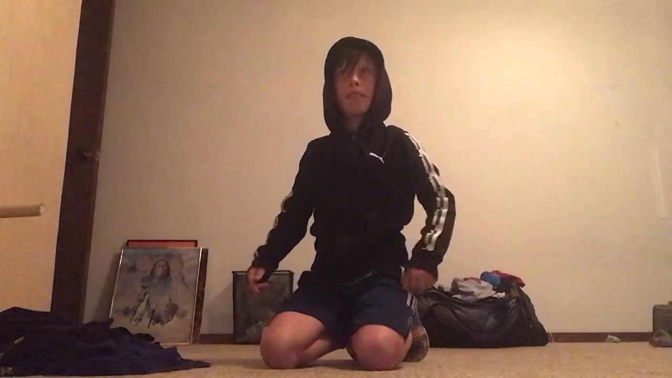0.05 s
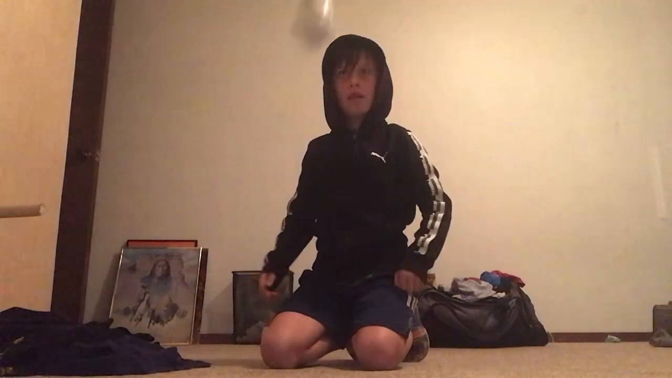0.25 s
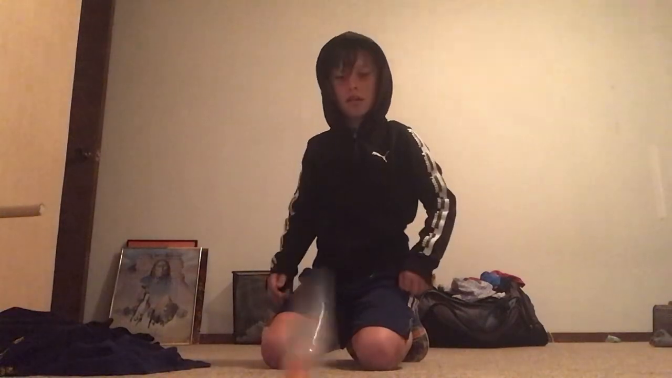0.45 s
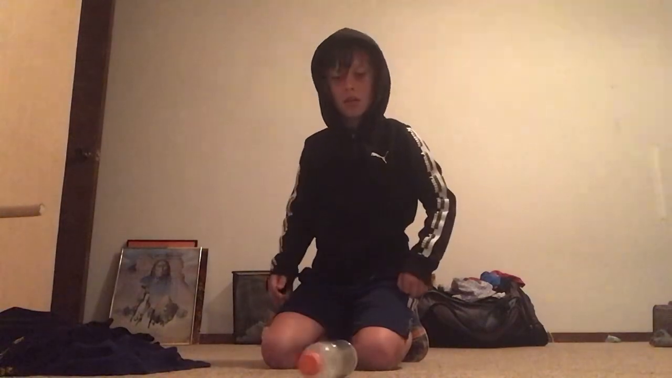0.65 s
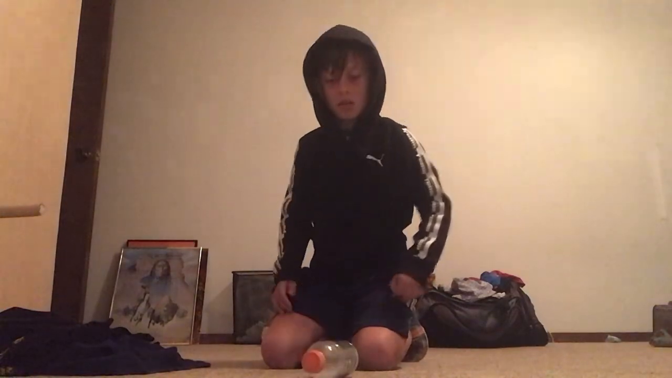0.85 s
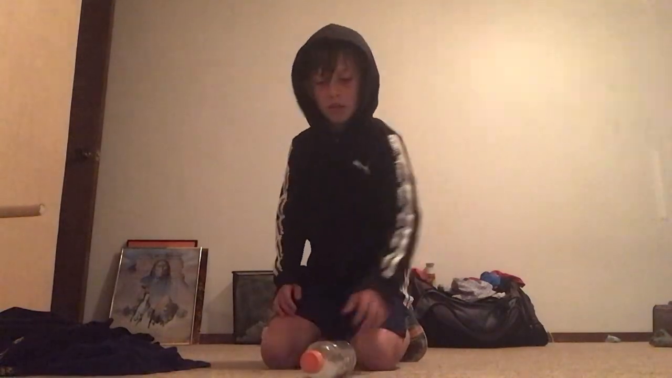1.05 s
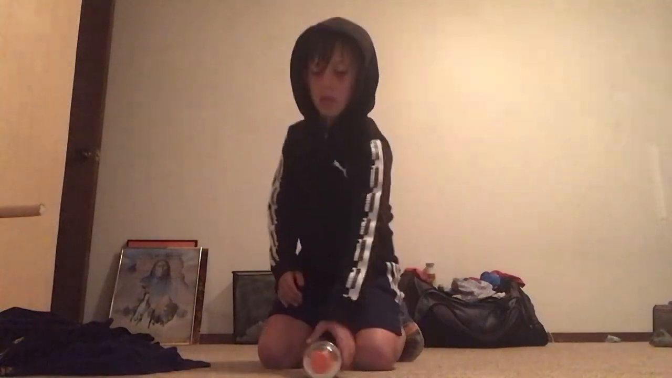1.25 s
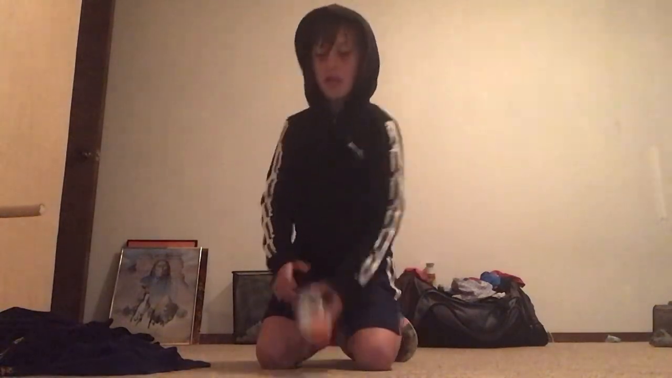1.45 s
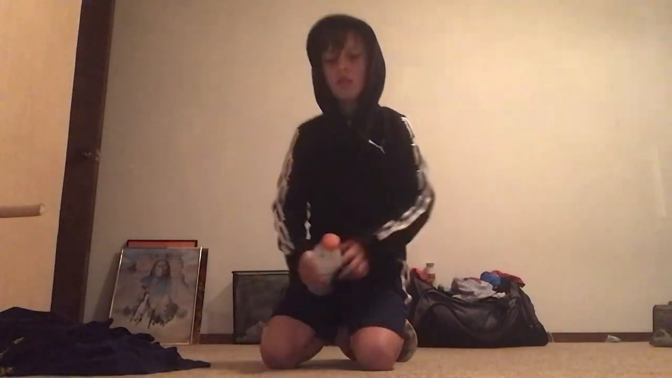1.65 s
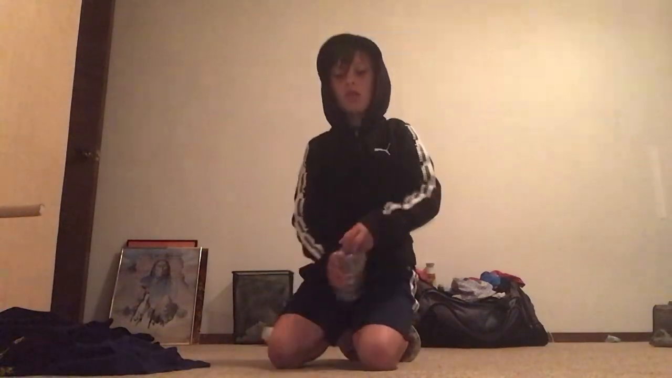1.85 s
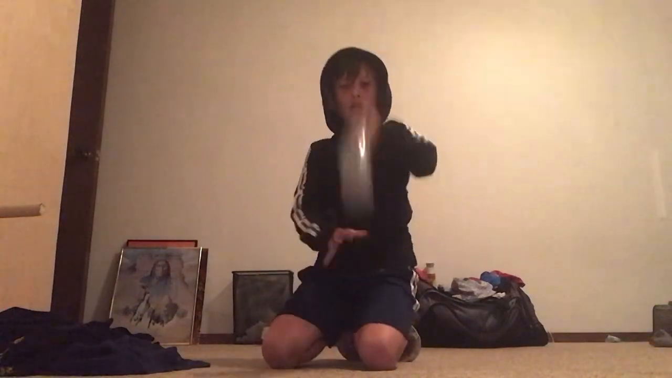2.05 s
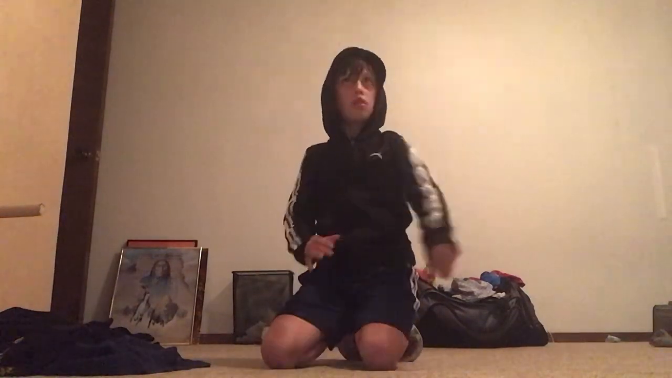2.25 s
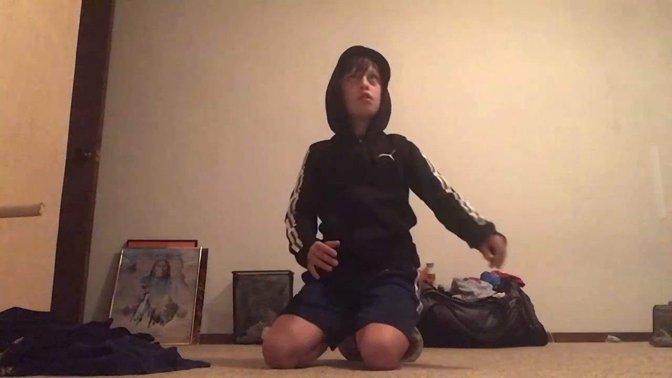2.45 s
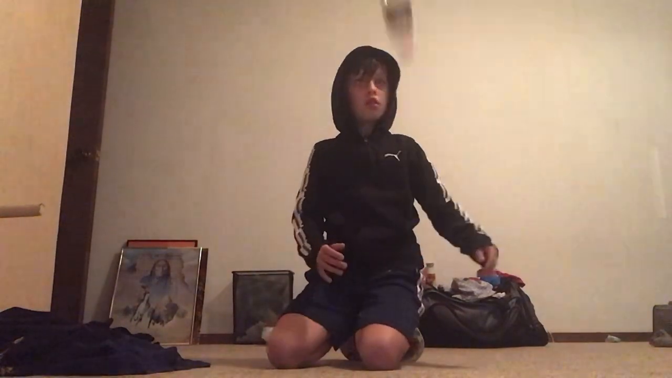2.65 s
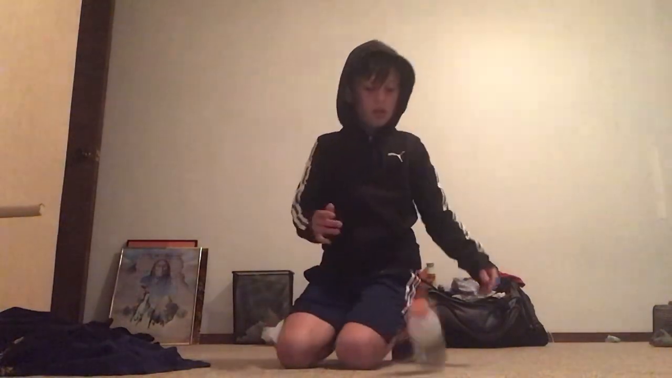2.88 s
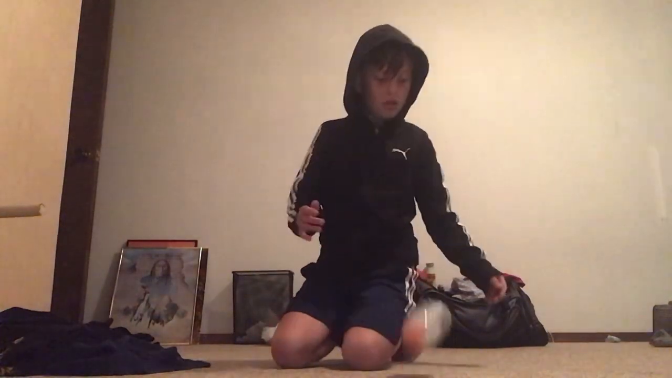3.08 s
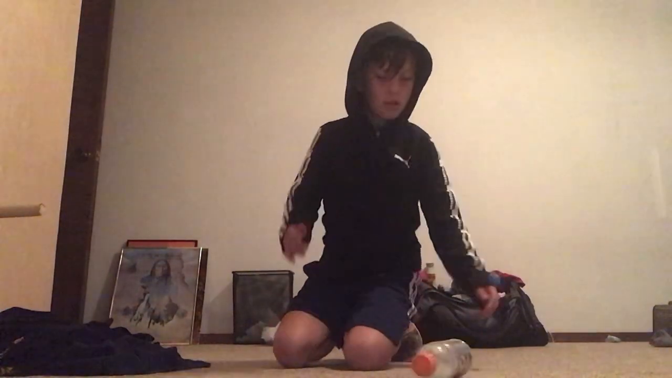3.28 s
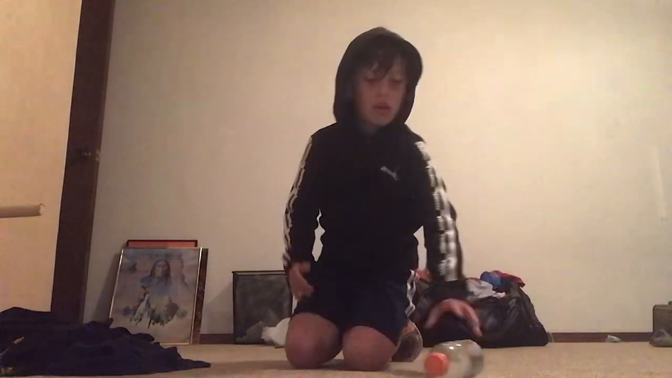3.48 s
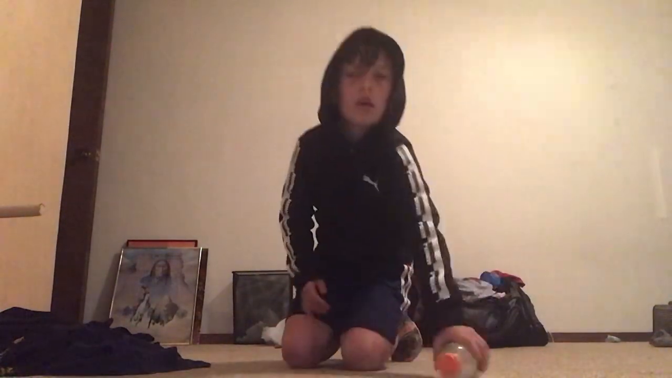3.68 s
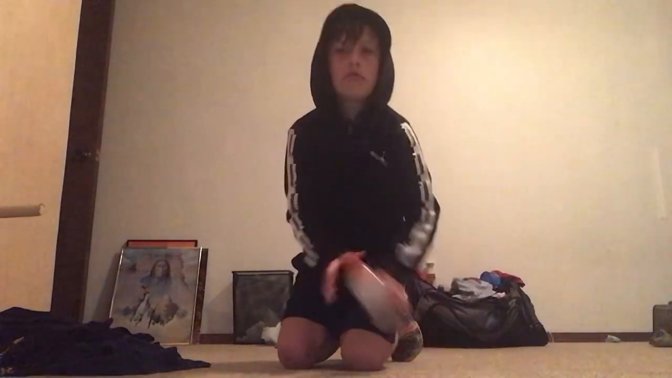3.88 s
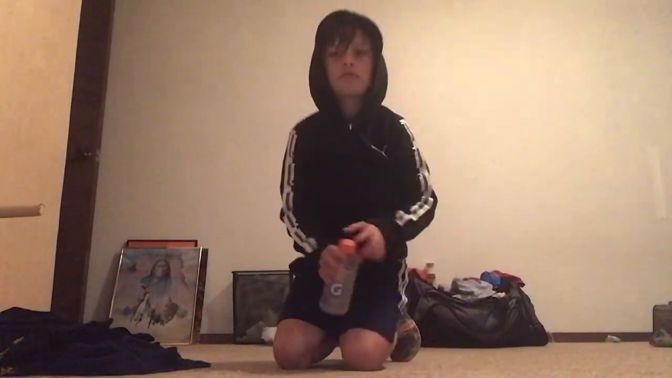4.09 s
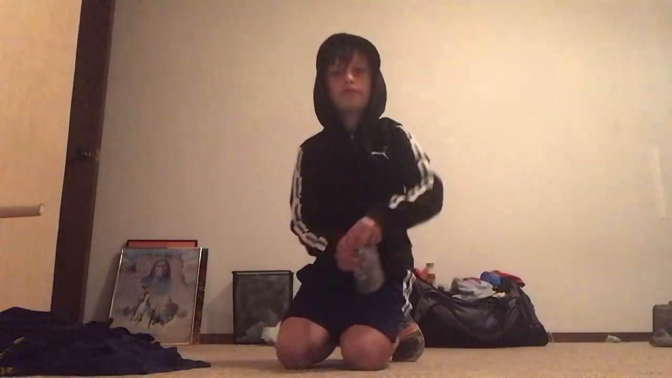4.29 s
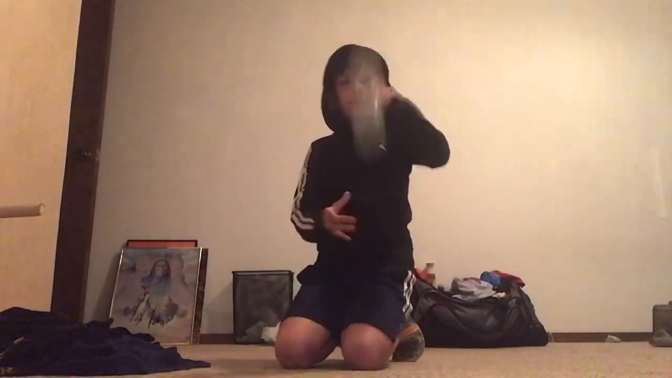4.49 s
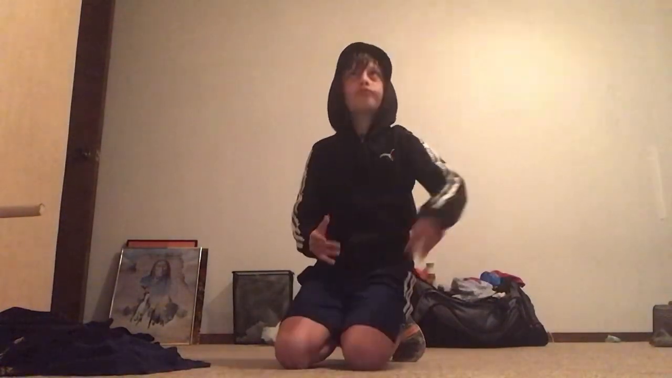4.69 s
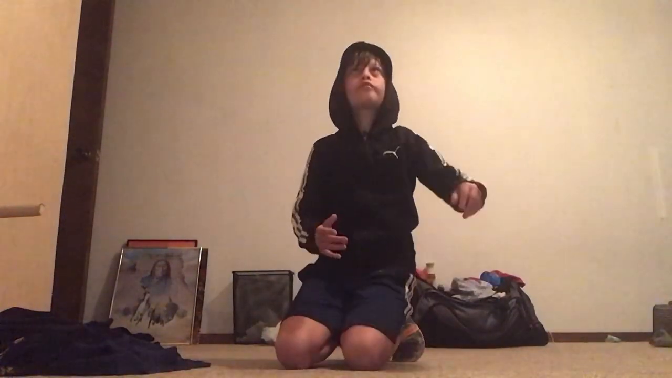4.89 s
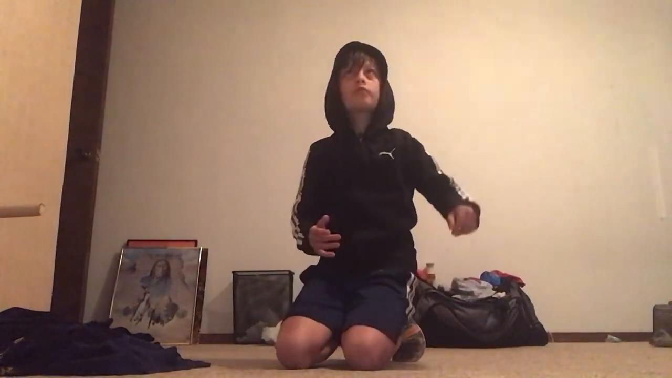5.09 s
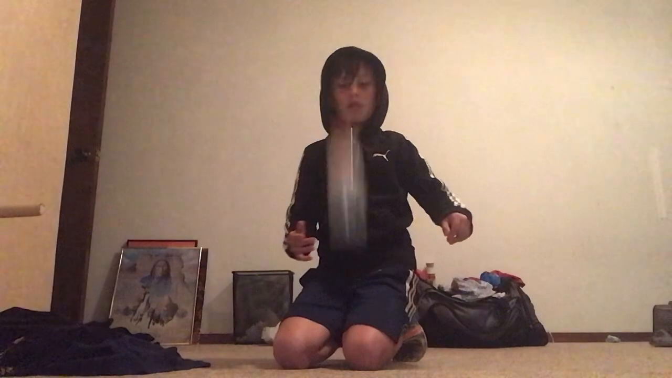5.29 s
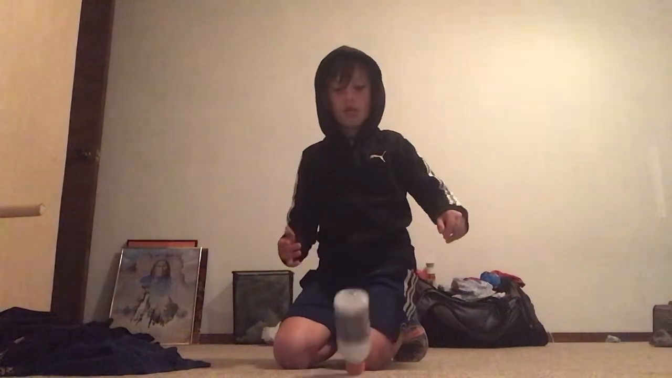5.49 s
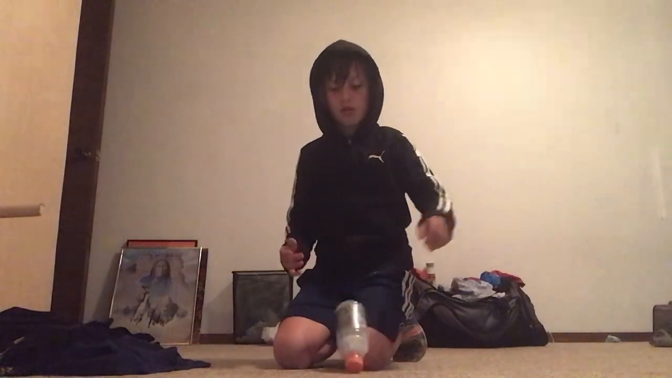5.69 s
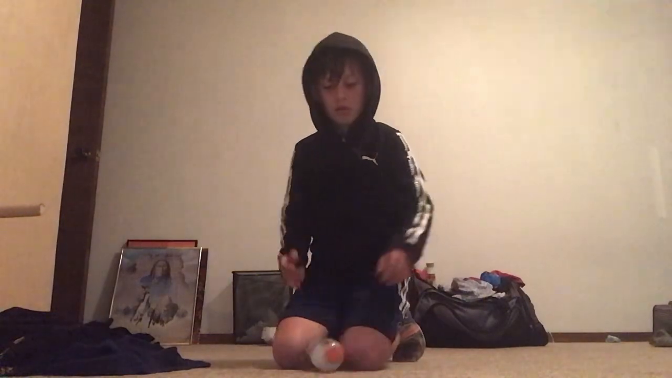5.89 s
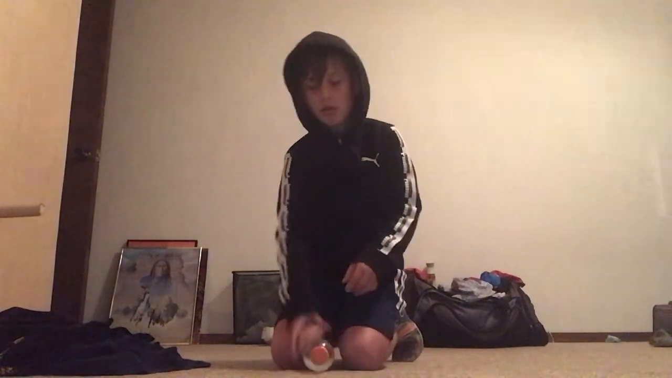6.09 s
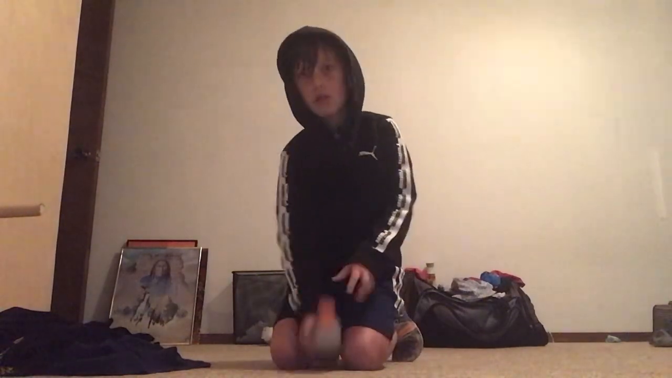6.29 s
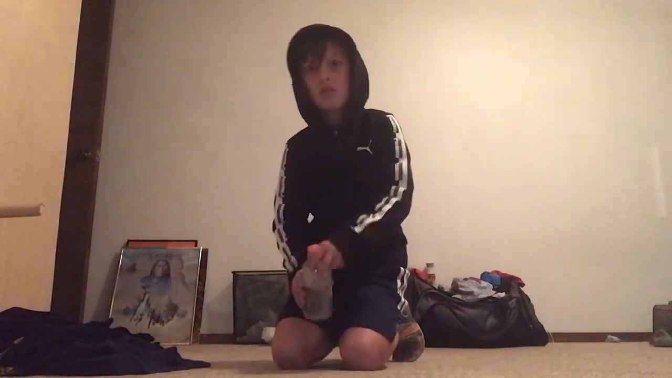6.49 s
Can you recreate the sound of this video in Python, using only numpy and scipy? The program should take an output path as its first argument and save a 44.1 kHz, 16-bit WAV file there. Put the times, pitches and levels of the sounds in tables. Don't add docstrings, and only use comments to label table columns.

```python
import sys
import numpy as np
from scipy import signal
from scipy.fft import rfft, irfft
from scipy.io import wavfile
from scipy.ndimage import uniform_filter1d

SR = 44100
rng = np.random.default_rng(int(sys.argv[2]) if len(sys.argv) > 2 else 0)


def store_wav(level_fs):
    pcm = np.round(np.clip(np.atleast_2d(level_fs), -1, 1) * 32767)
    wavfile.write(sys.argv[1], SR, pcm.T.astype(np.int16))


def makeup_ratio(level_db):
    decades = np.asarray(level_db, float) / 20
    return 10 ** decades


N = 288414

# (frequency [Hz], level per Hz [dB])
HUSH_COLOUR = [(26, -32.5), (45, 4), (92, 0), (291, -9), (525, -21), (760, -26), (948, -32), (2530, -34),
               (2860, -35), (3940, -34.5), (9320, -39.5), (13100, -44.5), (16000, -60)]
HUSH_DB = -64
# (frequency [Hz], width [Hz], level [dB])
HOUSE_TONES = [(610, 19, -82), (1815, 60, -91)]
TONE_TOPS_S = [.06, 1.45, 2.85, 3.43, 5.8]
TONE_SWELL_S, TONE_REST_DB = 1.6, -9
# (frequency [Hz], level [dB], time to fade by 60 dB [s])
ROOM_MODES = [(70, -19, 0.49), (97, -13.5, 0.42), (111.6, -11.5, 0.42), (146.5, 4, 0.29),
              (170.2, 1.5, 0.15), (222.2, -5.5, 0.35), (251.6, 0.5, 0.22), (305.7, -9.5, 0.37),
              (335.8, -10, 0.21), (368.2, -3.5, 0.22), (420.3, -10, 0.27), (488.4, -17.5, 0.32)]
# (frequency [Hz], time to fade by 60 dB [s])
ROOM_FADE = [(200, 0.37), (600, 0.43), (1500, 0.11), (4000, 0.29), (8000, 0.14), (14000, 0.16)]
# (frequency [Hz], level [dB], time to fade by 60 dB [s])
WALL_MODES = [(615, -10.5, 0.073), (729.3, -4, 0.089), (830.4, -3.5, 0.093), (932, -6.5, 0.053),
              (1052, -8.5, 0.069), (1170, -14, 0.043)]
# (frequency [Hz], level [dB])
MICROPHONE = [(20, -43.5), (40, -10), (70, 1), (8500, 0.5), (11000, -4.5), (13500, -8), (15800, -6),
              (16150, -11.5), (16400, -69)]

# (time of the top [s], fizz level [dB], rise per 60 dB [s], fall per 60 dB [s], centre [Hz])
RUSTLES = [(0.07, -69, 3, .35, 3950), (4.562, -68, .25, .1, 3500), (.72, -75, 0, 0.7, 4700),
           (1.22, -76, -0.3, 3, 4950), (1.392, -68.5, .5, 0.7, 5000), (2.156, -68, 0.43, 0.44, 4850),
           (2.201, -61, .31, .31, 5000), (2.86, -69.5, 0.36, 1.1, 4800), (3.87, -77, 2, 2, 4900),
           (4.17, -63, 1.5, 1.08, 4700), (5.32, -74.5, 2, 1.5, 3500), (5.919, -67, .14, .6, 4950),
           (5.99, -70, .7, .22, 4450), (6.261, -56, 0.25, .3, 5500), (6.52, -72, 1, -3, 5900)]
RUSTLE_SLOSH_DB, RUSTLE_SCUFF_DB = -7, 1.5
# (time [s], fizz level [dB], time to fade by 60 dB [s],
# slosh over fizz [dB], carpet scuff over fizz [dB])
SPLASHES = [(0.513, -40.5, 0.29, 0.5, 9), (1.576, -53.5, 0.68, -12, -3), (1.811, -56.5, 0.58, -9.5, -1.5),
            (1.946, -65.5, 0.68, -13, -12), (2.172, -51, .12, -5, 3), (2.236, -54.5, 0.5, -5.5, 0.5),
            (2.942, -31.5, 0.24, -5.5, 9.5), (3.05, -66, .5, 4, 7), (5.53, -66, .5, 4, 7),
            (3.199, -55, .48, 0, 5), (3.172, -64, 0.42, 3, 5), (3.5, -63.5, 0.32, -11.5, -10),
            (3.59, -65.5, .28, -3, -10), (3.68, -54.5, 0.55, -6.5, -5), (3.959, -45.5, 0.36, -11, -3.5),
            (4.578, -55, .11, -3, 6), (4.64, -51.5, 0.4, -7, 4), (5.421, -30.5, 0.25, -5, 7),
            (5.675, -49, 0.38, -7, 0.5), (6.436, -55, .22, -17, -8)]
SPLASH_RISE_S, LOW_LINGER = 0.047, 1.23
FRESH_HZ, SETTLED_HZ, SETTLE_S = 5900, 4500, .07
CRACKLES_PER_S, CRACKLE_DB, CRACKLE_SPREAD_DB = 90, -2, 2.4
CRACKLE_T60_S, CRACKLE_CAP_DB = .013, -62
SHUDDER_DB, SHUDDER_T60_S, SHUDDER_OCTAVES = -16, 0.29, .36

# (time [s], peak level [dB])
TICKS = [(0.2239, -64), (0.3252, -56), (1.2885, -56), (1.3508, -51), (1.4404, -57), (1.497, -62),
         (3.3478, -58.5), (3.9069, -56.5), (4.1914, -58), (4.3006, -58), (4.368, -62), (4.4042, -53.5),
         (4.9964, -59), (5.1441, -60.5), (5.8411, -57), (5.97, -53)]
TICK_HZ, TICK_T60_S, TICK_OCTAVES = 4700, 0.026, 1.35
# (time [s], peak level [dB], centre [Hz])
CRACKS = [(0.5168, -22.5, 4100), (1.3933, -45, 4000), (1.5733, -34, 6450), (1.5993, -51, 5200),
          (1.6395, -42, 5500), (1.8075, -40.5, 6700), (1.8156, -45.5, 4400), (1.9476, -45.5, 6100),
          (2.0013, -55, 5150), (2.1687, -42, 4500), (2.2288, -40.5, 5200), (2.9265, -28, 6700),
          (2.9376, -14.5, 6550), (3.203, -39, 6450), (3.2308, -43, 3520), (3.497, -46.5, 5330),
          (3.5838, -53, 5300), (3.679, -44, 6480), (3.9587, -29.5, 5160), (4.2264, -47.5, 4800),
          (4.4513, -49.5, 6280), (4.6228, -39.5, 4200), (5.4097, -17.5, 6400), (5.4137, -14.5, 6200),
          (5.6723, -38, 3870), (6.2417, -48, 5220), (6.4368, -39, 5970)]
CRACK_T60_S, CRACK_OCTAVES = 0.025, 0.88
# (time [s], peak level [dB])
TAPS = [(0.4925, -30), (0.5126, -27), (1.2042, -55), (2.2397, -37.5), (2.4897, -59), (2.9335, -21.5),
        (3.1684, -47.5), (3.7985, -53.5), (3.8496, -61), (4.1341, -50), (4.581, -43), (5.4017, -29),
        (5.907, -54.5), (6.1928, -53)]
TAP_HZ, TAP_T60_S, TAP_OCTAVES = 1950, .03, 1.25
# (time [s], peak level [dB], centre [Hz], time to fade by 60 dB [s], spread [octaves])
SPITS = [(2.934, -21, 4300, 0.024, 0.88), (5.415, -17.5, 9500, .02, 0.74), (3.168, -44, 8500, 0.021, 0.57),
         (.516, -29, 8600, .018, .55), (.477, -57, 570, .19, .85), (.488, -48, 2400, .051, 1.4),
         (5.381, -57, 1900, .09, .4), (5.395, -48.5, 910, .11, 1.4), (4.572, -48, 1600, .04, .9),
         (4.578, -39, 2350, .035, .3), (3.961, -48, 2300, .1, .5)]

# (time [s], peak level [dB], boom [Hz], wall knock [dB])
GRABS = [(1.291, -57, 130, -6), (1.499, -41, 415, -30), (1.57, -36.5, 368, -40), (1.805, -48.5, 298, -14),
         (1.853, -51, 338, -20), (2.173, -40, 312, -8), (2.229, -41.5, 304, -15), (3.676, -47.5, 391, -13),
         (3.791, -42, 351, -17.5), (3.959, -26, 380, -33), (4.089, -43, 357, -27), (4.58, -33, 295, -12),
         (4.615, -40, 290, -19.5), (6.213, -44, 236, -21), (6.411, -39, 300, -26)]
GRAB_T60_S, GRAB_ROOM_DB = 0.049, -7
# (time [s], peak level [dB], boom [Hz], time to fade by 60 dB [s])
THUMPS = [(2.935, -20.5, 93, .13), (5.412, -15, 797, .051), (4.576, -34.5, 640, 0.069),
          (4.579, -40, 2550, .03), (.516, -32, 920, .04), (2.946, -17, 376, .19), (3.168, -37, 654, 0.027),
          (5.419, -8.5, 210, .062), (3.18, -31, 230, .05), (.52, -22.5, 150, 0.14), (2.944, -15, 145, .17),
          (5.43, -19, 166, .14), (3.972, -38, 153, .14), (4.652, -39, 158, .11), (5.8, -58, 690, .2)]
THUMP_KNOCK_DB = -41
THUMP_ROOM_DB, THUMP_ROOM_DB_PER_OCTAVE = -14.5, -11
# (time [s], peak level [dB], boom [Hz], boom time to fade by 60 dB [s], wall knock [dB])
LANDINGS = [(0.492, -13, 330, .05, -15), (0.512, -14, 300, .07, -13), (0.526, -10, 265, .09, -27),
            (2.924, -13.5, 283, 0.045, -17.5), (2.932, -12, 350, .05, -8), (2.941, -8, 250, .09, -20),
            (3.167, -23, 330, .04, -20), (3.211, -28, 153.4, 0.054, -21), (5.404, -12.5, 346, 0.074, -16),
            (5.413, -7, 270, .06, -17), (5.426, -3.5, 274, 0.048, -34), (5.674, -32, 347, .02, -20),
            (5.779, -48, 276, .04, -15), (5.914, -40, 150, .08, -30), (5.908, -43, 311, .06, -16)]
LANDING_ROOM_DB = -10


def evened(x):
    return x / np.sqrt(np.mean(x ** 2) + 1e-20)


def read(points, hz):
    f, value = np.transpose(points)
    return np.interp(np.log(hz + 1), np.log(f + 1), value)


def add(mix, s, sound):
    part = mix[round(s * SR):][:len(sound)]
    part += sound[:len(part)]


def coloured(x, db_of):
    gain = makeup_ratio(db_of(np.fft.rfftfreq(len(x), 1 / SR)))
    return irfft(rfft(x) * gain, len(x))


def hump_db(f, hz, spread):
    return -6 * np.minimum((np.log2((f + 1) / hz) / spread) ** 2, 12)


def band_round(noise, hz, spread):
    return evened(coloured(noise, lambda f: hump_db(f, hz, spread)))


def swells(t, s, db, rise_s, fall_s):
    since = t - s
    below_top = np.where(since < 0, -since / abs(rise_s), since / abs(fall_s))
    return makeup_ratio(2 * (db - 60 * below_top))


def ring(modes, t, weights):
    hz, db, t60 = np.transpose(modes)[:, :, None]
    return (weights[:, None] * makeup_ratio(db - 60 * t / t60) * np.sin(2 * np.pi * hz * t)).sum(0)


def house_tones():
    noise = rng.standard_normal((len(HOUSE_TONES), N))
    tops = np.array(TONE_TOPS_S)[:, None]
    power = swells(np.arange(N) / SR, tops, 0, TONE_SWELL_S, TONE_SWELL_S).sum(0)
    come_and_go = np.sqrt(makeup_ratio(2 * TONE_REST_DB) + power)
    tones = sum(makeup_ratio(db) * band_round(z, hz, width / hz) for (hz, width, db), z in zip(HOUSE_TONES, noise))
    return come_and_go * tones


def hush():
    frames, hz = N // 256 + 5, np.fft.rfftfreq(1024, 1 / SR)[:, None]
    a, b, patches = rng.standard_normal((frames, 513, 3)).T
    patches = evened(uniform_filter1d(uniform_filter1d(patches, 10, 0), 16, 1))
    treble_lift = 6.4 * np.clip((hz - 9500) / 3500, 0, 1)
    top_drop = 9 * np.clip((hz - 14200) / 700, 0, 2)
    z = (a + 1j * b) * makeup_ratio(read(HUSH_COLOUR, hz) + treble_lift - top_drop + patches)
    return makeup_ratio(HUSH_DB) * evened(signal.istft(z, nperseg=1024, noverlap=768)[1][:N])


def room(x):
    taps = np.zeros(SR)
    start = np.arange(200, SR - 20, 20)
    taps[start + rng.integers(0, 20, len(start))] = rng.choice([-1., 1.], len(start))
    hz, t, z = signal.stft(taps, SR, nperseg=256)
    fade = makeup_ratio(-60 * t / read(ROOM_FADE, hz)[:, None])
    tail = signal.istft(z * fade, SR, nperseg=256)[1]
    tail[:180] = 0
    return signal.fftconvolve(x, tail / np.linalg.norm(tail))[:N]


def diffuse(x):
    hz, t, z = signal.stft(x, SR, nperseg=256, noverlap=192)
    power = uniform_filter1d(abs(z) ** 2, 5, 0)
    keep = makeup_ratio(-120 * 64 / SR / read(ROOM_FADE, hz))
    held = np.array([signal.lfilter([0, 0, 0, 1 - k], [1, -k], p) for k, p in zip(keep, power)])
    a, b = rng.standard_normal((len(t), len(hz), 2)).T
    return signal.istft(np.sqrt(held) * (a + 1j * b), SR, nperseg=256, noverlap=192)[1][:N]


def motion(t):
    s, db, t60, slosh_db, scuff_db = np.transpose(SPLASHES)[:, :, None]
    top, soft_db, rise_s, fall_s, hz = np.transpose(RUSTLES)[:, :, None]
    thrown = swells(t, s, db, SPLASH_RISE_S, t60)
    low = swells(t, s, db, SPLASH_RISE_S, t60 * LOW_LINGER)
    soft = swells(t, top, soft_db, rise_s, fall_s)
    sinking_hz = SETTLED_HZ + (FRESH_HZ - SETTLED_HZ) * np.exp(-np.maximum(t - s, 0) / SETTLE_S)
    fizz = thrown.sum(0) + soft.sum(0) + 1e-30
    slosh = (low * makeup_ratio(2 * slosh_db)).sum(0) + soft.sum(0) * makeup_ratio(2 * RUSTLE_SLOSH_DB)
    scuff = (low * makeup_ratio(2 * scuff_db)).sum(0) + soft.sum(0) * makeup_ratio(2 * RUSTLE_SCUFF_DB)
    centre_hz = ((thrown * sinking_hz).sum(0) + (soft * hz).sum(0)) / fizz
    return np.sqrt(fizz), np.sqrt(slosh), np.sqrt(scuff), centre_hz


def stirred_water():
    size = makeup_ratio(2.4 * np.minimum(rng.exponential(1, N), 4))
    bubbles = size * (rng.random(N) < 1800 / SR) * rng.standard_normal(N)
    grains = evened(bubbles) + 1.16 * rng.standard_normal(N)
    hz, t, z = signal.stft(grains, SR, nperseg=256, noverlap=192)
    fizz, slosh, scuff, centre_hz = motion(t)
    fizz = fizz * makeup_ratio(hump_db(hz[:, None], centre_hz, 0.6) + 5.5)
    slosh = slosh * makeup_ratio(hump_db(hz[:, None], 1300, 0.87) + 9.0)
    scuff = scuff * makeup_ratio(hump_db(hz[:, None], 480, 0.51) + 9.0)
    patches = rng.standard_normal((len(t), len(hz))).T
    patches = evened(uniform_filter1d(uniform_filter1d(patches, 3, 0), 14, 1))
    z = z * (fizz + slosh + scuff) * makeup_ratio(-6.0 + 3.7 * patches)
    return signal.istft(z, SR, nperseg=256, noverlap=192)[1][:N]


def crackle():
    t, at = np.arange(1024) / SR, np.arange(0, N, 64)
    size = makeup_ratio(CRACKLE_SPREAD_DB * np.minimum(rng.exponential(1, N), 3))
    size = size * (rng.random(N) < CRACKLES_PER_S / SR)
    strength = np.minimum(motion(at / SR)[0], makeup_ratio(CRACKLE_CAP_DB))
    size = size * np.interp(np.arange(N), at, strength)
    kind, noise = rng.integers(0, 8, N), rng.standard_normal((8, len(t)))
    out = np.zeros(N)
    for k, hz in enumerate(np.geomspace(1600, 7500, 8)):
        click = makeup_ratio(CRACKLE_DB - 60 * t / CRACKLE_T60_S) * band_round(noise[k], hz, .8)
        out += signal.oaconvolve(size * (kind == k), click)[:N]
    return out


def shudder():
    out, t = np.zeros(N), np.arange(SR // 2) / SR
    for s, db, hz in [row[:3] for row in LANDINGS + GRABS]:
        fade = makeup_ratio(db + SHUDDER_DB - 60 * t / SHUDDER_T60_S)
        rise = 1 - np.exp(-t / .008)
        shake = band_round(rng.standard_normal(len(t)), .9 * hz, SHUDDER_OCTAVES)
        add(out, s, fade * rise * shake)
    return out


def snap_rows():
    taps = [(*row, TAP_HZ, TAP_T60_S, TAP_OCTAVES) for row in TAPS]
    cracks = [(*row, CRACK_T60_S, CRACK_OCTAVES) for row in CRACKS]
    ticks = [(*row, TICK_HZ, TICK_T60_S, TICK_OCTAVES) for row in TICKS]
    return taps + cracks + ticks + SPITS


def snaps():
    out, t = np.zeros(N), np.arange(4096) / SR
    rise = 1 - np.exp(-(t / 0.0024) ** 2)
    for s, db, hz, t60, spread in snap_rows():
        dull_db = np.clip(0.2 * (db + 22.5), -8, 0)
        noise = rng.standard_normal(len(t))
        noise = coloured(noise, lambda f: dull_db * np.log2(np.maximum(f / 8200, 1)))
        add(out, s - .0015, makeup_ratio(db - 3 - 60 * t / abs(t60)) * rise * band_round(noise, hz, spread))
    return out


def blow_rows():
    landings = [(*row, LANDING_ROOM_DB) for row in LANDINGS]
    grabs = [(s, db, hz, GRAB_T60_S, knock_db, GRAB_ROOM_DB) for s, db, hz, knock_db in GRABS]
    thumps = []
    for row in THUMPS:
        octaves_up = max(np.log2(row[2] / 200), 0)
        thumps.append((*row, THUMP_KNOCK_DB, THUMP_ROOM_DB + THUMP_ROOM_DB_PER_OCTAVE * octaves_up))
    return landings + grabs + thumps


def blows():
    out, t = np.zeros(N), np.arange(SR // 2) / SR
    room_hz = np.transpose(ROOM_MODES)[0]
    for s, db, hz, t60, knock_db, room_db in blow_rows():
        u, v = rng.standard_normal((2, len(ROOM_MODES + WALL_MODES)))
        weights = np.sign(u) * makeup_ratio(3 * v)
        boom = makeup_ratio(-60 * t / abs(t60)) * np.sin(2 * np.pi * hz * t) * (1 - np.exp(-(t / 0.0031) ** 2))
        near = makeup_ratio(-8.5 * abs(np.log2(room_hz / hz))) * weights[:len(room_hz)]
        modes = ring(ROOM_MODES, t, near) * (1 - np.exp(-t / 0.0029))
        knock = ring(WALL_MODES, t * (1 + .04 * u[0]), weights[len(room_hz):])
        knock = knock * (1 - np.exp(-(t / 0.0027) ** 2))
        add(out, s - .0022, makeup_ratio(db) * (boom + makeup_ratio(room_db - 6.0) * modes + makeup_ratio(knock_db - 2.5) * knock))
    return out


def scene():
    background = hush() + house_tones()
    water, high, low = stirred_water(), snaps(), blows()
    wet = room(makeup_ratio(-11.5) * low) + diffuse(makeup_ratio(-0.5) * high + makeup_ratio(-10) * water)
    return (background + wet + water + crackle() + shudder() + high + low)[None]


def band_limit(x):
    return signal.sosfilt(signal.butter(12, 16180, fs=SR, output="sos"), x)


def record(dry):
    heard = coloured(dry[0], lambda f: read(MICROPHONE, f))[None]
    return band_limit(heard)


dry = scene()
out = record(dry)
store_wav(out)
```